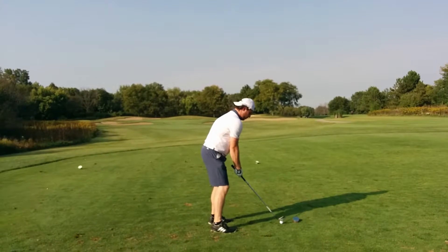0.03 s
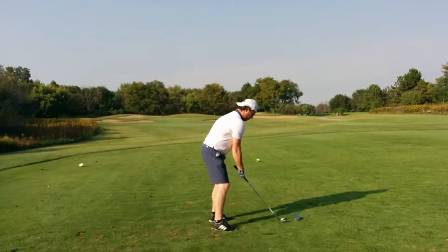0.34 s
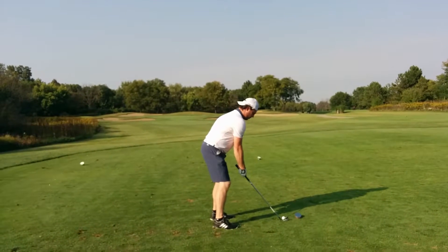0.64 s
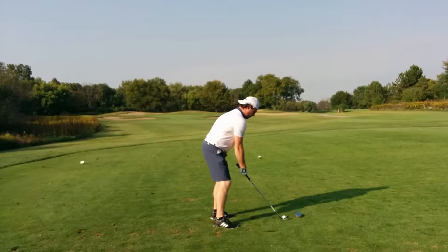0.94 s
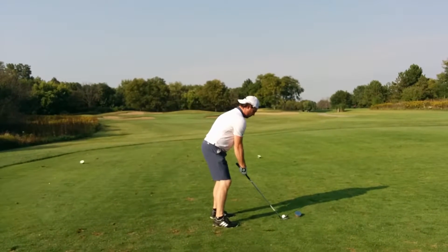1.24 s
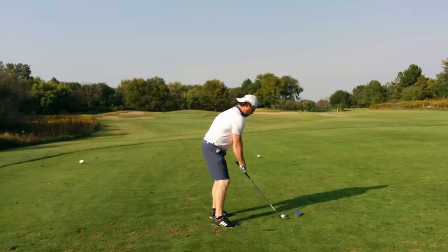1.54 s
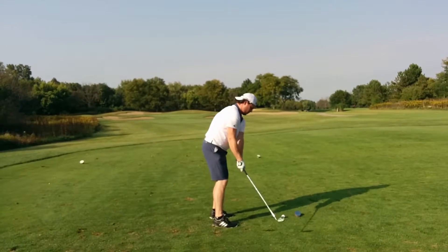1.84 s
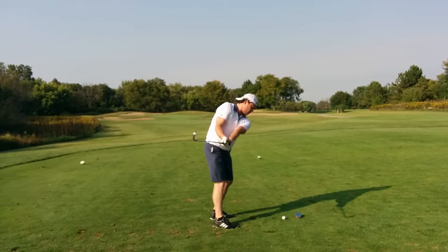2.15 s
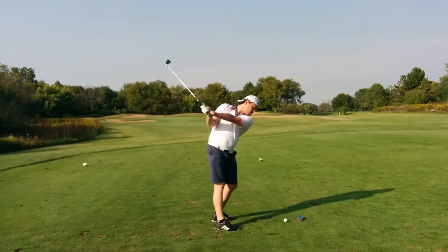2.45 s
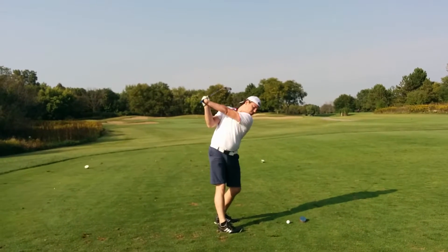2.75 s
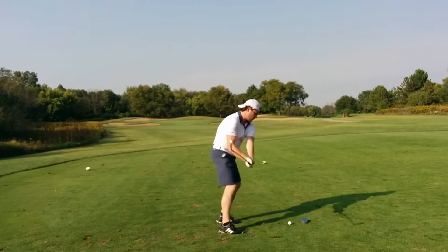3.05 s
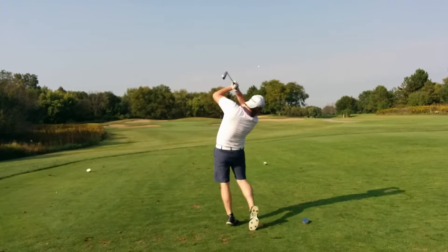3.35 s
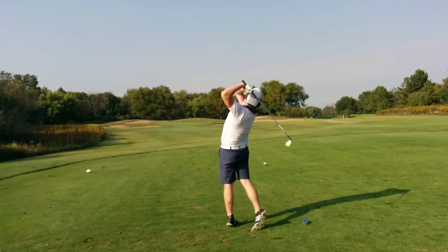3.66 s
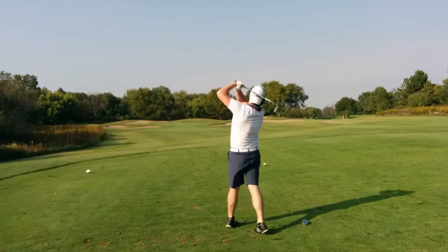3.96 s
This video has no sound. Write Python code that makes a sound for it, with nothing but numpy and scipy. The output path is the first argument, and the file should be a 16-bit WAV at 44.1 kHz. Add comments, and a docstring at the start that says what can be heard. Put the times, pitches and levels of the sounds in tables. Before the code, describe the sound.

One sharp crack of a golf drive outdoors, amid gusts of wind rumble.

```python
"""A golfer drives a ball off the tee on an open course, a few metres from the microphone.
From the start, gusts buffet the microphone over a quiet, distant outdoor hum.
The club swishes down, and at 3.24 s its hollow metal head cracks against the ball.
The tee ticks away, the trees return a faint echo and the follow-through hisses softly.
The gusts carry on to the end."""
import sys
import numpy as np
from scipy import signal
from scipy.fft import rfft, irfft
from scipy.io import wavfile
from scipy.ndimage import uniform_filter1d

SR = 44100
rng = np.random.default_rng(int(sys.argv[2]) if len(sys.argv) > 2 else 0)


def transcribe(u):
    """Save the signal u as a 16-bit wav file named by the first command-line argument.

    u: samples, shape (n,) or (channels, n), limited to [-1, 1]; the rate is SR.
    q: integer samples, one column per channel.
    """
    v = np.clip(np.atleast_2d(u).T, -1, 1)
    q = np.round(v * 32767).astype(np.int16)
    wavfile.write(sys.argv[1], SR, q)


N = 176400  # 4 s

STRIKE_S, ATTACK_S, HOLD_S, RING_GAIN_DB = 3.244, 0.00016, 0.0024, 1.5
# club head and ball modes (frequency [Hz], relative level [dB], T60 [s])
HEAD_MODES = [(674, -23, .023), (1192, -30.5, 0.0086), (1542, -25, 0.021), (1940, -19, 0.0065),
              (2848, -17, .010), (3237, -23, .010), (3580, -26, 0.013), (4168, -20.5, 0.014),
              (5520, -28, 0.009), (6126, -23.5, 0.0093), (7510, -21, .007), (8550, -32.5, 0.0069),
              (11210, -30.5, .005), (14100, -33, .007)]
# contact crack (frequency [Hz], relative density [dB])
CRACK_SPECTRUM = [(100, -4.5), (400, -0.5), (900, 4), (1400, -4.5), (2500, 0.5), (5000, -1), (8000, -5.5),
                  (10000, -10.5), (14000, -8), (17000, -8.5)]
# dull thud of the blow (frequency [Hz], relative density [dB])
THUD_SPECTRUM = [(40, -12), (90, 4), (250, -1.5), (450, -3.5), (700, -8.5), (1500, -29.5), (4000, -60)]
# turf scatter (frequency [Hz], relative density [dB])
TURF_SPECTRUM = [(100, 0.5), (400, -2.5), (800, 5), (1500, -5), (3000, -13), (6000, -15), (10000, -22.5),
                 (16000, -22.5)]


def strike(t):
    """Head and ball ring briefly over the crack and thud of contact; the turf scatters a short tail."""
    age_s = t - STRIKE_S
    attack = np.clip(age_s / ATTACK_S, 0, 1)
    release_s = np.maximum(age_s - HOLD_S, 0)
    ring = sum((-1) ** k * undb(db) * np.sin(2 * np.pi * hz * age_s) * decay(release_s, t60_s)
               for k, (hz, db, t60_s) in enumerate(HEAD_MODES))
    crack = undb(-9.5) * noise(CRACK_SPECTRUM) * decay(age_s, t60_s=0.012)
    thud = undb(-25.5) * noise(THUD_SPECTRUM) * decay(age_s, t60_s=0.047)
    turf = undb(-36.5) * noise(TURF_SPECTRUM) * decay(age_s, t60_s=0.15)
    return attack * (undb(RING_GAIN_DB) * ring + crack + thud + turf)


TICK_T60_S, TICK_WIDTH_HZ = 0.009, 1600
# ticks of the flying tee (time [s], level [dB], centre [Hz])
TEE_TICKS = [(3.2533, -33, 5500), (3.268, -37.5, 5815), (3.2720, -46, 3627)]


def tee(t):
    """The tee is knocked away with small, bright ticks."""
    ticks = np.zeros(N)
    for at_s, db, hz in TEE_TICKS:
        band = shaped_noise(lambda f: 1 / (1 + (2 * (f - hz) / TICK_WIDTH_HZ) ** 2))
        ticks += undb(db) * decay(t - at_s, TICK_T60_S) * band
    return ticks


FOLLOW_S, FOLLOW_WIDTH_S = 3.61, 0.11
# air round the club, downswing (frequency [Hz], relative density [dB])
SWISH_SPECTRUM = [(150, -15), (500, -0.5), (900, -1.5), (2000, -8), (3500, -13), (4800, -25), (9000, -26),
                  (16000, -30.5)]
# follow-through hiss (frequency [Hz], relative density [dB])
FOLLOW_SPECTRUM = [(4500, -18), (7000, 4.5), (10000, 4), (13000, -2), (16000, -6)]


def swish(t):
    """Air noise grows as the club speeds towards the ball and returns faintly in the follow-through."""
    downswing = undb(-55) * noise(SWISH_SPECTRUM) * swell(t - STRIKE_S, rise_s=0.038, fall_s=0.02)
    follow_env = np.exp(-((t - FOLLOW_S) / FOLLOW_WIDTH_S) ** 2)
    return downswing + undb(-81.5) * noise(FOLLOW_SPECTRUM) * follow_env


ECHO_PEAK_S = 3.39
# echo off the trees (frequency [Hz], relative density [dB])
ECHO_SPECTRUM = [(300, 1.5), (800, 6), (1300, -3), (2400, 1.5), (4000, -11), (4900, -5.5), (5800, -8.5),
                 (9000, -2), (13000, -9.5), (16000, -11)]


def tree_echo(t):
    """A diffuse echo swells after the strike and dies away."""
    env = swell(t - ECHO_PEAK_S, rise_s=0.14, fall_s=0.056) * (t > STRIKE_S)
    return undb(-66) * noise(ECHO_SPECTRUM) * env


CRACKLE_EXPONENT, HISS_EXPONENT = 1.13, 0.57
# eddies at the microphone (time [s], level [dB], half width [s], upper corner [Hz])
WIND_EDDIES = [(.031, -19.5, 0.0065, 260), (0.064, -28, 0.0096, 190), (.102, -29, 0.013, 267),
               (0.149, -23, 0.014, 177.6), (0.196, -27, 0.0078, 363), (.218, -18.5, 0.0068, 343),
               (0.2207, -30, 0.0017, 854), (0.242, -33, 0.024, 350), (0.3, -29, .013, 148.5),
               (0.352, -38, .02, 260), (0.38, -32.5, .011, 282), (0.427, -38, .02, 148),
               (0.592, -54, 0.028, 105), (0.734, -47, 0.013, 162), (0.791, -29, .011, 133),
               (1.007, -49.5, 0.0055, 142), (1.071, -41.5, 0.017, 128.5), (1.19, -35, 0.011, 101),
               (1.215, -32.5, .011, 137), (1.283, -38, 0.012, 209), (1.339, -28.5, 0.016, 140),
               (1.356, -24.5, 0.0073, 260), (1.405, -35, 0.032, 127), (1.452, -29, 0.0072, 229),
               (1.497, -34.5, 0.015, 139), (1.543, -42.5, 0.04, 127), (1.594, -36.5, 0.0085, 102),
               (1.731, -42.5, 0.017, 177), (1.786, -41, 0.022, 165), (1.821, -47.5, 0.014, 150),
               (1.856, -45.5, .017, 135), (2.205, -53, 0.016, 132), (2.29, -34.5, 0.013, 150),
               (2.314, -17.5, 0.0065, 240), (2.36, -26.5, 0.018, 153.5), (2.41, -37, 0.023, 152),
               (2.464, -20.5, 0.01, 206), (2.5, -30.5, 0.013, 157), (2.549, -43.5, .013, 150),
               (2.634, -44.5, 0.021, 147), (2.851, -56, 0.018, 124), (3.299, -31.5, 0.0045, 166),
               (3.355, -44, 0.029, 130.1), (3.41, -41.5, 0.019, 193), (3.503, -46.5, 0.011, 110),
               (3.591, -35, 0.017, 98), (3.644, -39, 0.016, 111), (3.739, -40, 0.0094, 109.2),
               (3.775, -42.5, 0.0087, 135), (3.828, -43.5, 0.019, 119), (3.938, -28.5, 0.012, 118.4),
               (3.966, -24, 0.005, 218), (3.993, -44, 0.0065, 161)]
# eddy crackle (frequency [Hz], relative density [dB])
CRACKLE_SPECTRUM = [(300, 3.5), (700, 4.5), (1200, -8), (2000, -19.5), (3500, -22), (4800, -31.5),
                    (8000, -29), (16000, -40.5)]
# gust hiss (frequency [Hz], relative density [dB])
HISS_SPECTRUM = [(1500, -3), (3300, -3), (4800, -9.5), (7500, 3), (10000, 0), (13000, -7.5), (16000, -6)]


def wind(t):
    """Eddies buffet the microphone port; the hardest crackle, and a faint hiss follows the gusts."""
    rumble = np.zeros(N)
    size = 16384
    for at_s, db, half_width_s, corner_hz in WIND_EDDIES:
        start = int(np.clip(at_s * SR - size / 2, 0, N - size))
        span = slice(start, start + size)
        rumble[span] += undb(db) * eddy(t[span] - at_s, half_width_s, corner_hz)
    pressure = np.abs(uniform_filter1d(np.abs(rumble), size=200))
    gust_rms = np.sqrt(np.abs(uniform_filter1d(rumble ** 2, size=8000)))
    crackle = undb(-29) * pressure ** CRACKLE_EXPONENT * noise(CRACKLE_SPECTRUM)
    hiss = undb(-65) * gust_rms ** HISS_EXPONENT * noise(HISS_SPECTRUM)
    return rumble + crackle + hiss


def eddy(age_s, half_width_s, corner_hz, low_cut_hz=57):
    """One burst of rumble, rms about 1 at its crest; the microphone cuts the deepest bass."""
    def colour(hz):
        tilt = hz ** -0.23
        low_pass = 1 / np.hypot(1, (hz / corner_hz) ** 3.75)
        high_pass = 1 / np.hypot(1, (low_cut_hz / hz) ** 8)
        return tilt * low_pass * high_pass

    env = np.exp(-0.5 * np.abs(age_s / half_width_s) ** 1.686)
    burst = env * shaped_noise(colour, len(age_s))
    return burst * np.sqrt(np.sum(env ** 2) / np.sum(burst ** 2))


FLUTTER_RMS_DB, FLUTTER_HZ, BAND_OCT = 3.5, 25, 0.18
# distant outdoor hum (frequency [Hz], relative density [dB])
HUM_SPECTRUM = [(25, -3.5), (70, 6), (200, -2.5), (400, -4.5), (750, 2), (1100, -5), (1700, -13),
                (2600, -19.5), (3800, -24.5), (5000, -34), (16000, -50)]
# hum drift, before flutter (time [s], level [dB])
HUM_DRIFT = [(0, -71), (.55, -72), (1.05, -70), (1.6, -65), (2.14, -67), (2.49, -64.5), (2.75, -66.5),
             (3.2, -67), (3.6, -69.5), (4, -70)]


def distant_hum(t):
    """The outdoor hum drifts in level, each band fluttering independently."""
    spectrum = rfft(noise(HUM_SPECTRUM))
    octaves = np.log2(np.clip(np.fft.rfftfreq(N, 1 / SR), 200, 4500))
    band = np.round(octaves / BAND_OCT)
    hum = np.zeros(N)
    for k in np.unique(band):
        flutter_db = FLUTTER_RMS_DB * shaped_noise(lambda f: 1 / (1 + (f / FLUTTER_HZ) ** 2) ** 2)
        hum += irfft(spectrum * (band == k), N) * undb(flutter_db)
    drift_db = np.interp(t, *np.array(HUM_DRIFT).T)
    return undb(drift_db) * hum


def mic_hiss():
    """The microphone's own white noise."""
    return undb(-82) * rng.standard_normal(N)


def undb(db):
    """Decibels to gain."""
    return 10 ** (np.asarray(db) / 20)


def shaped_noise(gain, size=N):
    """Unit-rms noise whose spectrum follows gain(Hz)."""
    hz = np.maximum(np.fft.rfftfreq(size, 1 / SR), 1)
    x = irfft(rfft(rng.standard_normal(size)) * gain(hz), size)
    return x / x.std()


def noise(spectrum):
    """Unit-rms noise coloured by a spectrum table."""
    hz, db = np.array(spectrum, float).T
    return shaped_noise(lambda f: undb(np.interp(np.log(f), np.log(hz), db)))


def decay(age_s, t60_s):
    """Silence before age 0, then exponential decay."""
    return (age_s >= 0) * np.exp(-np.log(1000) * np.clip(age_s / t60_s, 0, 10))


def swell(age_s, rise_s, fall_s):
    """Exponential rise to age 0, then exponential fall."""
    return np.exp(np.where(age_s < 0, age_s / rise_s, -age_s / fall_s))


def scene():
    """The drive in the wind, mono."""
    t = np.arange(N) / SR
    drive = strike(t) + tee(t) + swish(t) + tree_echo(t)
    return (drive + wind(t) + distant_hum(t) + mic_hiss())[None]


def record(dry):
    """The recorder rounds the loudest peaks and cuts the top treble."""
    ceiling, cutoff_hz = 0.65, 16400
    low_pass = signal.ellip(10, 0.1, 80, cutoff_hz, fs=SR, output="sos")
    return signal.sosfilt(low_pass, ceiling * np.tanh(dry / ceiling))


dry = scene()
out = record(dry)
transcribe(out)
```